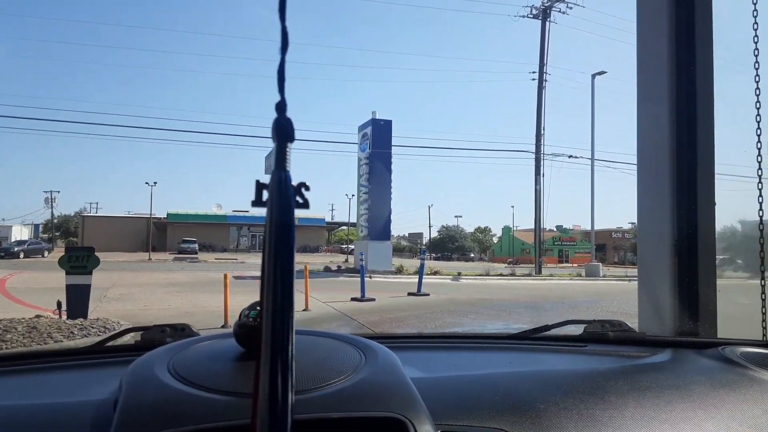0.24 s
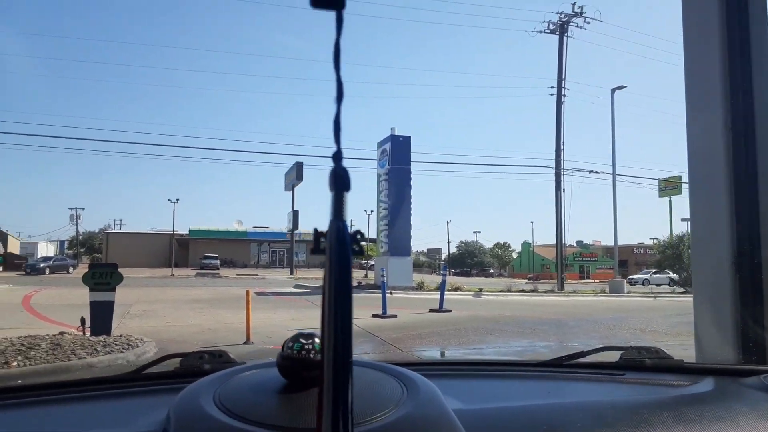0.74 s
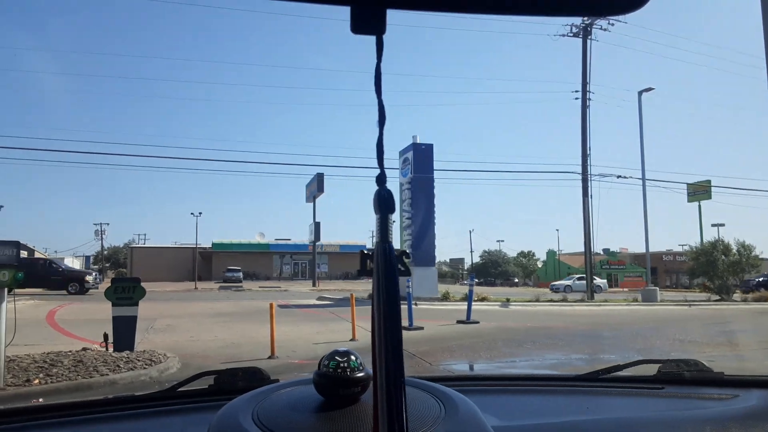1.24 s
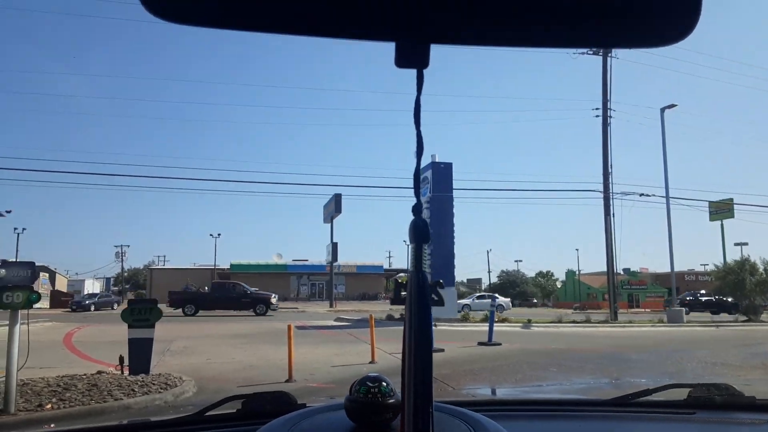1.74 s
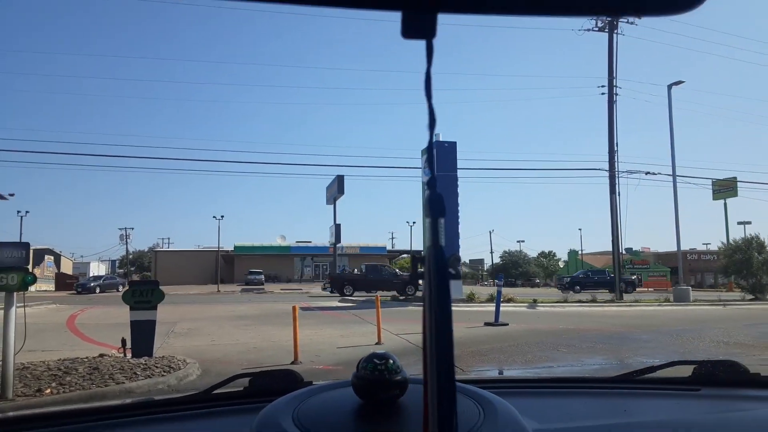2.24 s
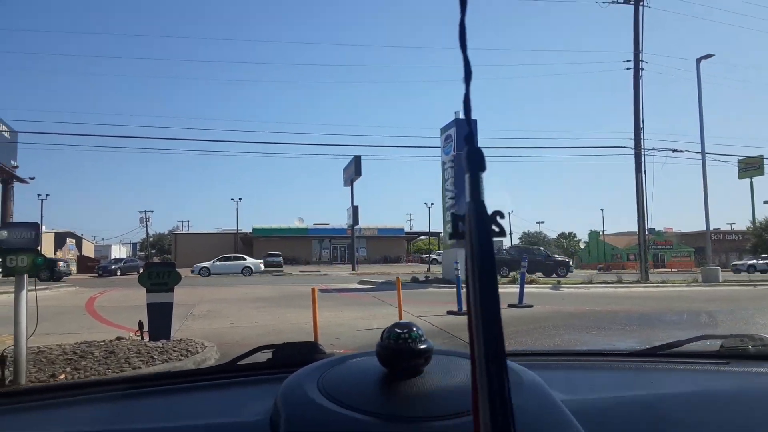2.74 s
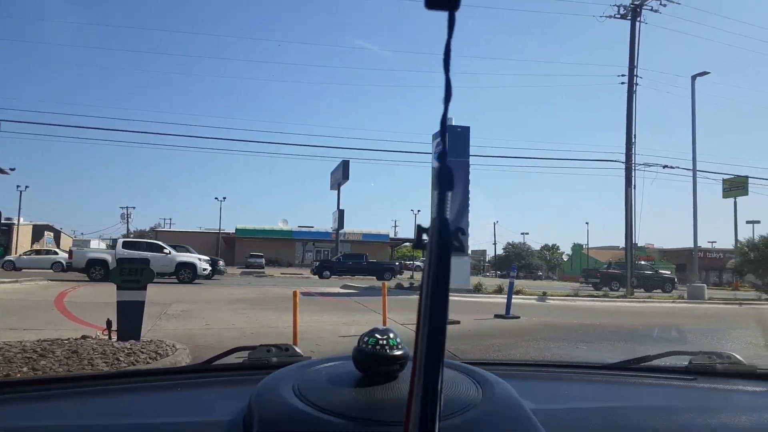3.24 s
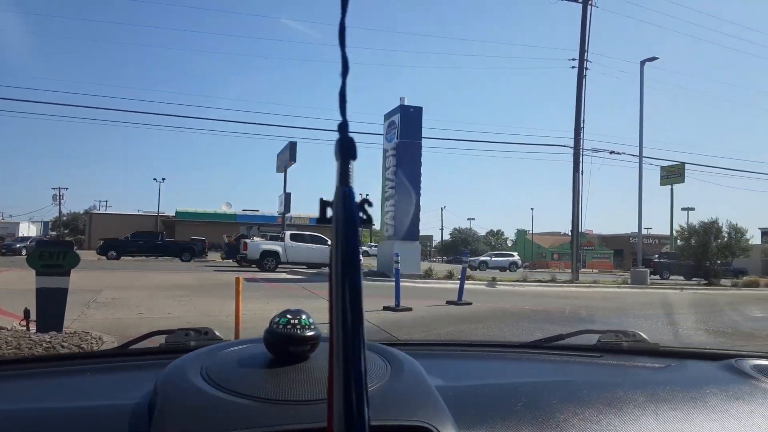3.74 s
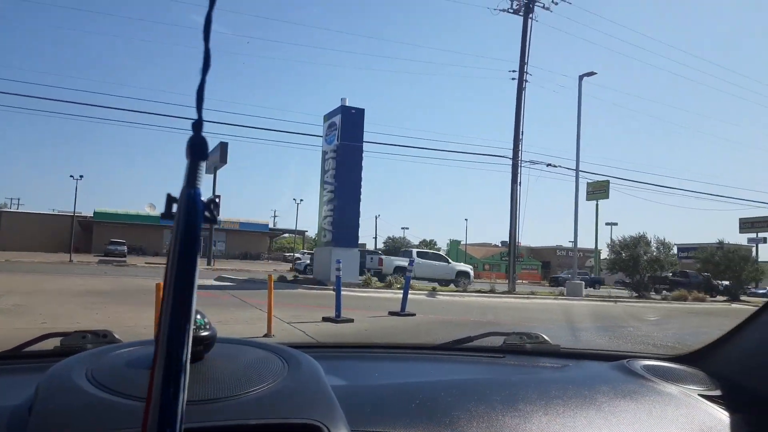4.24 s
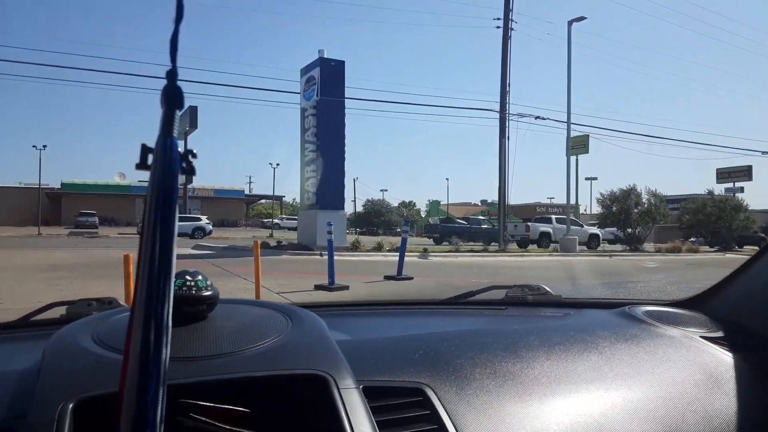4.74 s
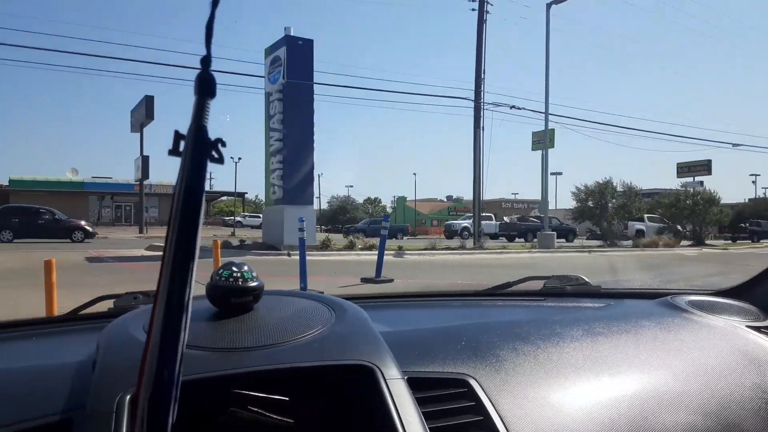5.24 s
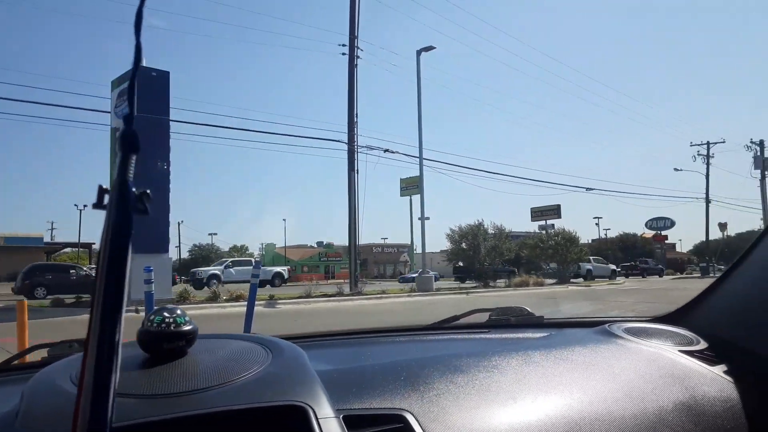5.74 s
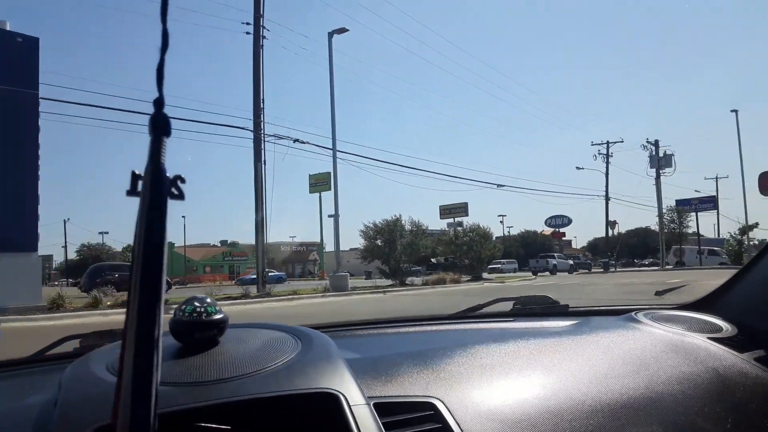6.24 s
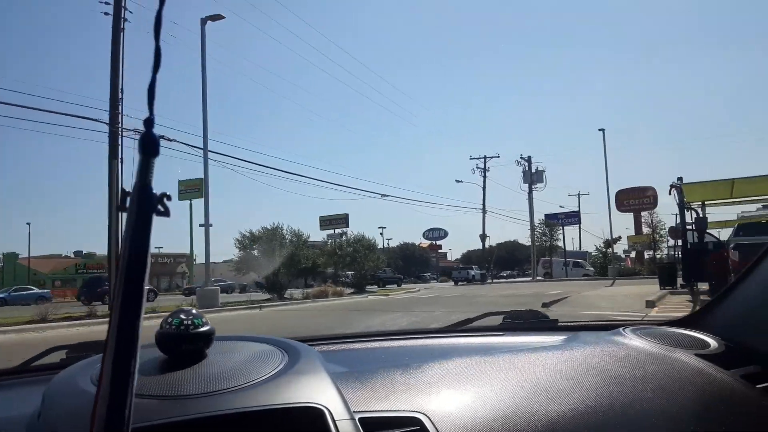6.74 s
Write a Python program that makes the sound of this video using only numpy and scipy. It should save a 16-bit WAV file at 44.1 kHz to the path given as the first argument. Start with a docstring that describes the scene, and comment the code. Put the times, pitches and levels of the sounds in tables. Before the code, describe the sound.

From 0 to about 2.4 s, loud dryer jets drum on a car body, heard inside the cabin: deep boomy rumble around 100 to 140 Hz, broad fan roar around 250 to 400 Hz, and much quieter dull hiss, all gusting and fluttering. A fan hum near 475 Hz swells and dips. Small dry ticks fall at 0.3, 1.0, 1.2, 1.4 and 1.5 s. From 2.4 to 3.6 s the drumming drops by over 10 dB as the car rolls out; roar and hiss fall less. Two switched-off fans coast down, sliding gradually to about 290 and 250 Hz and fading, clearest between 3 and 6 s, against the steadier running fan, strong near 4.9 s. After 4.3 s a faint low engine hum and thin wet-road hiss enter. Faint ticks come at 2.9, 4.7 and 5.2 s, then a distinct click at 6.15 s. Subdued rumble continues to 7 s.

```python
"""Air jets drum the body of a car that rolls out from under the dryer blowers of a car wash, heard in its cabin.
Jets, fan roar and hiss are turbulent noise, coloured by resonances that change as the car leaves the jets.
The fans sing their blade tone, a wavering sine; two are switched off, coast down and fall in pitch.
A low engine hum enters as the car pulls away, and small things tick as short rings of band-passed noise.
A two-microphone phone hears it all: each layer has its own correlation or lead, and balance, left to right."""
import sys
import numpy as np
from scipy import signal
from scipy.io import wavfile
from scipy.ndimage import uniform_filter1d

SR = 44100
rng = np.random.default_rng(int(sys.argv[2]) if len(sys.argv) > 2 else 0)


def to_wav(sig):
    """Store sig (one row per channel, or 1-D mono) as 16-bit WAV at the path in sys.argv[1].

    Samples outside -1..1 are clipped; the rate is SR.
    """
    pcm = np.clip(np.atleast_2d(sig), -1, 1) * 32767
    pcm = np.round(pcm).astype(np.int16)
    wavfile.write(sys.argv[1], SR, pcm.T)  # frames by channels


N = 307808
TIME_S = np.arange(N) / SR
LEFT_RIGHT = np.array([[0.5], [-0.5]])  # shares a left-minus-right difference between the microphones

LEAVE_S = 2.38, 3.564  # the car starts and ends leaving the jets
DRUM_ROAR_HZ, ROAR_HISS_HZ, HISS_TOP_HZ = 210, 900, 8800  # edges between the noise layers
BODY_WANDER = 0.035  # share by which the body's resonances wander as the jets sweep it
BLADE_HZ = 475.3


def undb(db):
    """Level is logarithmic: 20 dB is a factor of ten in amplitude."""
    return 10 ** (np.asarray(db) / 20)


def across(table, hz):
    """Spectra are read on a logarithmic frequency axis, where equal steps are equal intervals."""
    table_hz, value = np.transpose(table)
    return np.interp(np.log(hz), np.log(table_hz), value)


def walk(rate, shape, step):
    """Band-limited fluctuation: random values held about 1 / rate, then slewed; step is the sample spacing."""
    hold = max(int(1 / rate / step), 1)
    drawn = rng.standard_normal((*shape[:-1], shape[-1] // hold + 1))
    held = np.repeat(drawn, hold, axis=-1)
    return 1.15 * uniform_filter1d(held, hold, axis=-1)[..., :shape[-1]]  # spread near 1


def departure(lag_s=0):
    """Linear transition from under the jets (0) to out in the open (1)."""
    return np.interp(TIME_S - lag_s, LEAVE_S, (0, 1))


def cabin_ripple_db(hz, time_s):
    """Modal overlap: crowded cabin resonances ripple the response, and blur together towards the treble."""
    depth_db, spacing_hz = 2.2, 45  # depth ahead of the blurring
    crowded_hz, blur_hz = 600, 2500  # the few bass resonances are part of the colours
    drift = 0.4 * time_s  # radians; the hand-held phone moves through the ripple
    ripple = walk(1 / spacing_hz, (2, len(hz)), hz[3] - hz[2])
    here, there = ((hz > crowded_hz) / (1 + hz / blur_hz) * ripple)[..., None]
    return depth_db * (here * np.cos(drift) + there * np.sin(drift))


def air(colours, band, out, level_db, tilt_db, flicker_db, gust_db, rate, like=None, wander=0):
    """Turbulence is broadband noise: it takes a sliding colour, gusts as a whole and flickers by half octaves."""
    # left-right correlation: hz, correlation
    likeness = [(60, 0.97), (120, 0.95), (240, 0.93), (490, 0.72), (980, 0.13), (1960, -0.044),
                (3950, -0.022), (7930, -0.0058)]
    # balance of the microphones: hz, left_minus_right_db
    balance = [(60, 3), (100, 2), (180, 4.5), (310, 0.5), (530, 1.5), (900, 2), (1560, 0.5), (2680, 2),
               (4610, 0.5), (7930, -2), (12000, 0)]
    frame, hop = 4096, 512  # samples
    overlap = frame - hop
    hz = np.maximum(np.fft.rfftfreq(frame, 1 / SR), 1)
    mid, side = signal.stft(rng.standard_normal((2, N)), nperseg=frame, noverlap=overlap)[2]
    at = np.minimum(np.arange(mid.shape[1]) * hop, N - 1)  # sample of each frame

    moved_hz = hz[:, None] * np.exp(wander * walk(5, (len(at),), hop / SR))
    near_db, far_db = (across(c, moved_hz) for c in colours)
    colour_db = near_db + out[at] * (far_db - near_db) + tilt_db[at] * np.log2(hz)[:, None]
    inside = (hz >= band[0]) & (hz < band[1])
    gain = inside[:, None] * undb(colour_db)
    correlation = across(likeness, hz) if like is None else like + 0 * hz
    correlation = np.clip(correlation, -0.99, 0.99)[:, None]
    mid_power, side_power = (1 + correlation) / 2, (1 - correlation) / 2
    # the layer's level is that of what both microphones share
    gain = gain / np.sqrt(np.mean(gain ** 2 * mid_power, axis=0))

    half_octaves = walk(rate, (32, len(at)), hop / SR)
    place = 2 * np.log2(hz)
    low, share = place.astype(int), (place % 1)[:, None]
    flicker = (1 - share) * half_octaves[low] + share * half_octaves[low + 1]
    gust = walk(rate, (len(at),), hop / SR)
    gain = gain * undb(flicker_db * flicker + gust_db * gust + cabin_ripple_db(hz, at / SR))

    lean = undb(across(balance, hz) / 2)[:, None]
    mid, side = mid * np.sqrt(mid_power), side * np.sqrt(side_power)
    both = np.array([(mid + side) * lean, (mid - side) / lean]) * gain
    return signal.istft(both, nperseg=frame, noverlap=overlap)[1][:, :N] * undb(level_db)


def tone(hz, table, waver_hz, waver_db, pan_db, lead, roam):
    """Rotation gives a sine whose phase integrates its frequency; level, pitch and place may waver."""
    s, db = np.transpose(table)
    phase = 2 * np.pi * np.cumsum(hz + waver_hz * walk(12, (N,), 1 / SR)) / SR
    # fades in before the table's first time and out after its last, 0.085 s each
    fade = np.clip(1 + np.minimum(TIME_S - s[0], s[-1] - TIME_S) / 0.085, 0, 1)
    level_db = np.interp(TIME_S, s, db) + waver_db * walk(6.9, (N,), 1 / SR)
    size = np.sqrt(2) * fade * undb(level_db)  # levels are rms
    balance, lead_wander = roam * walk(4.2, (2, N), 1 / SR)
    pan = undb(LEFT_RIGHT * (pan_db + 3.9 * balance))
    return size * pan * np.sin(phase + LEFT_RIGHT * (lead + lead_wander))  # lead in radians


def drive():
    """Superposition: the noise layers follow separate courses of level and spectral tilt along the drive."""
    # start_s, drumming_db, roar_db, hiss_db, drumming_tilt_db_per_octave, hiss_tilt_db_per_octave
    course = [(0.0, -20, -21, -45, 7, -0.5), (0.4, -16.5, -22.5, -47, 3.5, 0),
              (0.75, -15.5, -19, -47, 0.5, 0.3), (1.2, -16, -21, -46.5, -0.5, -0.5),
              (1.5, -17, -19, -46.5, -1.5, -0.5), (2.05, -15.5, -21.5, -47.5, -1, -0.3),
              (2.5, -20, -24.5, -49.5, -1, -0.4), (2.8, -21, -25.5, -48.5, -3.5, -0.7),
              (3.05, -20, -28, -49.5, 1.5, 0), (3.3, -27, -28, -49.5, -2, 0),
              (3.85, -31, -28.5, -50, 1.5, 0), (4.3, -30, -28.5, -49.5, 1, -0.6),
              (4.6, -31.5, -28, -49.5, 1, 0), (5.05, -30, -27.5, -49, -3, 0),
              (5.2, -29.5, -32, -50, 0, -0.5), (5.4, -33, -30, -52, -5, 0.5),
              (5.52, -31, -32, -50.5, 0, 0.2), (6.1, -31.5, -32.5, -52.5, -2, -0.3),
              (6.98, -32, -33.5, -51.5, -3.5, -1.6)]
    s, *columns = np.transpose(course)
    return [np.interp(TIME_S, s, column) for column in columns]


def body_drumming(level_db, tilt_db):
    """Forced vibration: jets excite the low resonances of the body, which wander as the jets sweep it."""
    # colours under the jets, then in the open: hz, relative_db
    body = ([(22, -43), (36, -22.5), (45, -7), (58, -7), (72, -8.5), (86, -17.5), (100, -1.5), (118, 3),
             (138, -3), (152, -6), (170, -5.5), (190, -12.5), (210, -10)], [(22, -36), (36, -21.5),
             (45, -6.5), (58, -7), (72, -8.5), (86, -10.5), (100, -2.5), (118, 0), (138, -1), (152, -9.5),
             (170, -16), (190, -17.5), (210, -10.5)])
    return air(body, (15, DRUM_ROAR_HZ), departure(), level_db, tilt_db,
               flicker_db=1.5, gust_db=-0.25, rate=5.4, wander=BODY_WANDER)


def fan_roar(level_db):
    """Turbulent flow noise of the fans fills the midrange, coloured by resonance."""
    # colours under the jets, then in the open: hz, relative_db
    roar = ([(210, -11.5), (228, -4.5), (262, 0.5), (300, -0.5), (332, 3), (370, -5), (410, -9),
             (445, -11.5), (520, -10), (570, -16), (630, -21), (700, -20.5), (840, -23), (900, -24.5)],
             [(210, -15), (228, -3), (262, -3), (300, 1), (332, -2), (370, -4.5), (410, -15), (445, -9.5),
             (520, -6.5), (570, -13), (630, -18.5), (700, -15.5), (800, -17.5), (900, -23.5)])
    return air(roar, (DRUM_ROAR_HZ, ROAR_HISS_HZ), departure(), level_db, 0 * TIME_S,
               flicker_db=1.5, gust_db=0.0, rate=4, wander=BODY_WANDER / 2)


def running_fans():
    """Blade-passing tone: it swells as fans beat and the car moves through echoes, and sags as it moves off."""
    # start_s, level_db
    swells = [(0.0, -42), (0.2, -34), (0.52, -46), (0.68, -30), (1.0, -30.5), (1.2, -47), (1.55, -34.5),
              (1.9, -43), (2.45, -49), (2.65, -37), (2.95, -42), (3.2, -39), (3.6, -40), (3.9, -44),
              (4.15, -34), (4.3, -32.5), (4.48, -43), (4.62, -33), (4.9, -28.5), (5.1, -33.5), (5.4, -41),
              (5.58, -55), (6.25, -51), (6.42, -39), (6.62, -36.5), (6.98, -48)]
    receding_hz = 473.2
    hz = BLADE_HZ + departure() * (receding_hz - BLADE_HZ)
    return tone(hz, swells, waver_hz=0.7, waver_db=0.5, pan_db=-2.0, lead=0.38, roam=0.25)


def coasting_fan(coast_s, table):
    """Air drag grows with the square of speed, so a free fan slows as 1 / (1 + t / T)."""
    switch_off_s = 1.85
    hz = BLADE_HZ / (1 + np.maximum(TIME_S - switch_off_s, 0) / coast_s)
    return tone(hz, table, waver_hz=0.6, waver_db=1, pan_db=0.5, lead=-0.29, roam=0.28)


def stopped_fans():
    """Inertia sets the coasting time: of two fans switched off together, one slows quicker."""
    # slower fan: start_s, level_db
    slower = [(1.9, -44), (2.25, -41), (2.7, -45), (3.05, -37), (3.25, -36), (3.4, -28), (3.52, -33),
              (3.72, -32.5), (3.9, -41), (4.05, -36), (4.32, -33), (4.48, -45), (4.62, -32), (4.75, -35),
              (4.92, -39), (5.1, -35), (5.2, -34.5), (5.31, -29), (5.41, -30), (5.48, -43), (5.85, -37),
              (6.3, -41), (6.7, -50)]
    # quicker fan: start_s, level_db
    quicker = [(2.1, -40), (2.6, -43), (3.05, -38), (3.3, -48), (3.65, -48), (3.88, -31), (4.05, -39),
               (4.3, -35), (4.5, -41), (5.2, -49)]
    return coasting_fan(7.8, slower) + coasting_fan(5.8, quicker)


def engine_hum():
    """Periodic firing gives a low tone, whose level rises as the car pulls away."""
    # start_s, level_db
    pull = [(4.3, -56), (4.7, -44), (5.2, -45), (6.6, -47), (6.98, -44)]
    return tone(43.9, pull, waver_hz=0.4, waver_db=2.5, pan_db=2.5, lead=0, roam=0)


def ticks():
    """Impact excites damped ringing: a snap and a quick bounce decay in four bands, scattered by the cabin."""
    # start_s, level_6600_hz_db, level_3700_hz_db, level_12650_hz_db, level_1950_hz_db, left_minus_right_db
    impacts = [(0.306, -48.5, -49, -66, -55, 0), (0.9981, -48, -52, -75, -55, 0),
               (1.1975, -44.5, -47, -69, -46, -3), (1.2155, -50, -47, -74, -55, -3),
               (1.367, -54, -50, -80, -39, -2), (1.503, -46, -44.5, -72, -41, -1),
               (2.9193, -50, -48, -80, -55, -1), (4.7333, -48, -43, -77, -57, -2),
               (5.176, -55, -47, -77, -55, 3), (6.1444, -33, -37.5, -44, -39, -6)]
    # ringing bands: centre_hz, width_hz, ring_time_s (to fall 60 dB)
    ringing = [(6600, 2200, 0.061), (3700, 1900, 0.05), (12650, 5300, .04), (1950, 1300, 0.05)]
    bounce_s, bounce_db = 0.0028, -6.5
    snap_s, snap_db = 0.0015, 3  # the snap stands this far over the ring
    out, t = np.zeros((2, N + SR)), np.arange(SR // 10) / SR
    snap = undb(snap_db * (t < snap_s))
    for s, *levels_db, pan_db in impacts:
        noise = rng.standard_normal((3, len(t)))
        noise = noise[0] + 0.29 * noise[1:]  # mostly alike at both microphones
        start = int(s * SR)
        for (hz, width, t60), db in zip(ringing, levels_db):
            decay = np.exp(-np.log(1000) * t / t60)
            # the same decay begun again at the bounce
            bounce = (t > bounce_s) * undb(bounce_db + 60 * bounce_s / t60)
            edges = [hz - width / 2, hz + width / 2]
            band_pass = signal.butter(3, edges, "band", fs=SR, output="sos")
            band = signal.sosfilt(band_pass, snap * decay * (1 + bounce) * noise)
            size = undb(db + LEFT_RIGHT * pan_db) / np.abs(band).max()
            out[:, start:start + len(t)] += size * band
    return out[:, :N]


def air_hiss(level_db, tilt_db):
    """Small eddies make high frequencies; this hiss takes on its open-air colour later than the roar."""
    # colours under the jets, then in the open: hz, relative_db
    hiss = ([(900, 0.5), (1000, -3), (1260, -5), (1450, -6), (1650, -8.5), (2000, -11.5), (2600, -14.5),
             (3200, -17.5), (4500, -19), (5500, -20.5), (6900, -25.5), (7800, -31), (8400, -38),
             (8800, -46)], [(900, 0), (1000, -3), (1260, -4), (1480, -7.5), (1680, -4.5), (1850, -9),
             (2000, -11.5), (2600, -16.5), (3200, -15.5), (4500, -16), (5500, -22), (6900, -23),
             (7800, -29), (8400, -34.5), (8800, -45.5)])
    return air(hiss, (ROAR_HISS_HZ, HISS_TOP_HZ), departure(lag_s=0.6), level_db, tilt_db,
               flicker_db=1.18, gust_db=0.41, rate=11)


def swell(s, half_width_s, db):
    """A Gaussian rise and fall of level in dB."""
    return db * np.exp(-((TIME_S - s) / half_width_s) ** 2)


def top_hiss():
    """Thin treble noise with brief puffs; it rises slowly once the car rolls on wet road."""
    # colours under the jets, then in the open: hz, relative_db
    treble = ([(8800, -2), (9500, -8.5), (10800, -9), (12000, -7.5), (15000, -8)], [(8800, -1.5),
               (9500, -5), (10800, -3), (12000, 0), (15000, 1)])
    # peak_s, half_width_s, added_db
    puffs = [(0.095, 0.025, 9), (3.04, 0.058, 6.5), (5.04, 0.08, 2.7), (5.72, 0.044, 3)]
    wet_road_db = np.interp(TIME_S, (4.0, 4.8), (0, 7.5))
    level_db = -83 + wet_road_db + sum(swell(*puff) for puff in puffs)
    return air(treble, (HISS_TOP_HZ, 20000), departure(), level_db, 0 * TIME_S,
               flicker_db=-0.5, gust_db=1.5, rate=6, like=0.55)


def scene():
    """Superposition: jets, fans, engine and ticks add as sound pressures at the two microphones."""
    drum_db, roar_db, hiss_db, drum_tilt, hiss_tilt = drive()
    jets = body_drumming(drum_db, drum_tilt) + fan_roar(roar_db)
    fans = running_fans() + stopped_fans()
    hiss = air_hiss(hiss_db, hiss_tilt) + top_hiss()
    return jets + fans + engine_hum() + ticks() + hiss


def record(dry):
    """Band limiting: the phone cuts the deepest bass and the top."""
    bass_cut = signal.butter(2, 16, "high", fs=SR, output="sos")
    top_cut = signal.ellip(10, 0.2, 70, 15650, fs=SR, output="sos")  # 0.2 dB ripple, 70 dB stop band
    return signal.sosfilt(top_cut, signal.sosfilt(bass_cut, dry))


dry = scene()
out = record(dry)
to_wav(out)
```